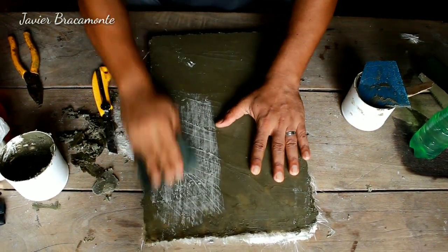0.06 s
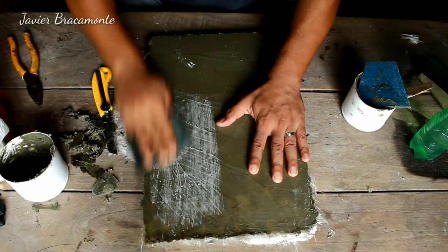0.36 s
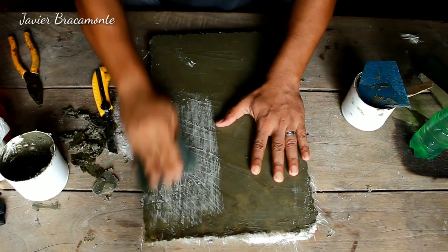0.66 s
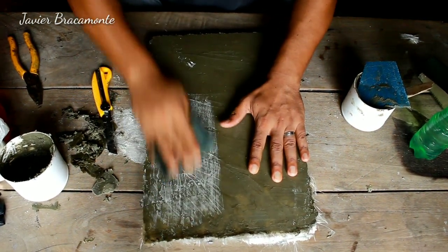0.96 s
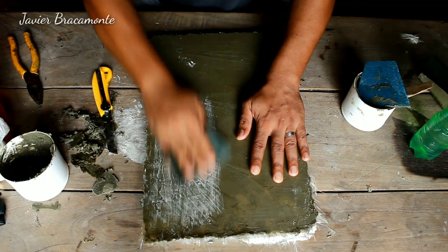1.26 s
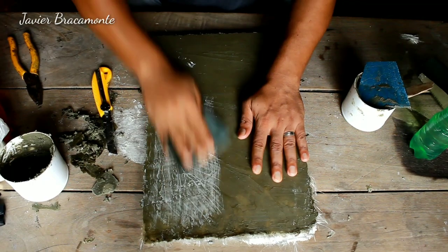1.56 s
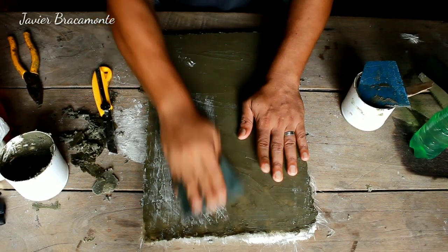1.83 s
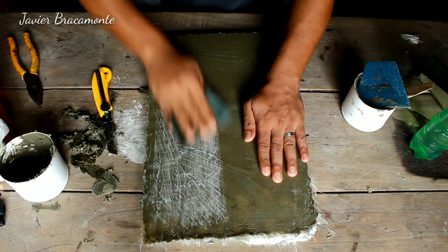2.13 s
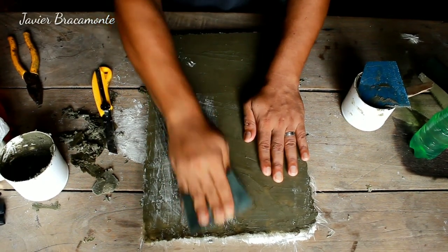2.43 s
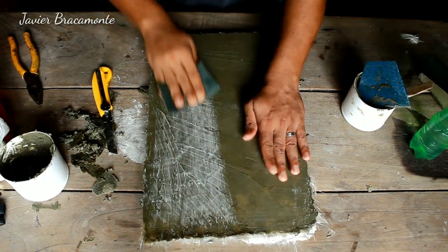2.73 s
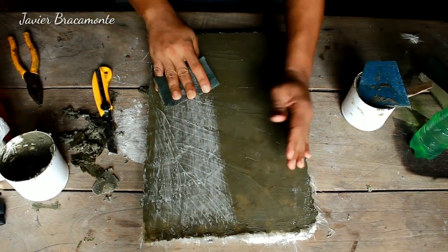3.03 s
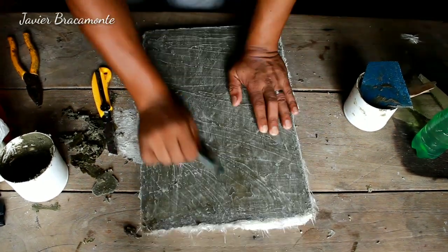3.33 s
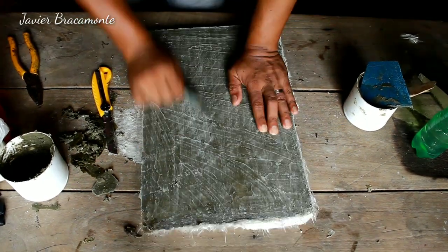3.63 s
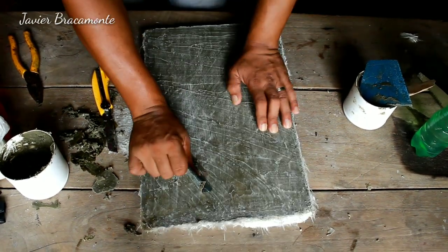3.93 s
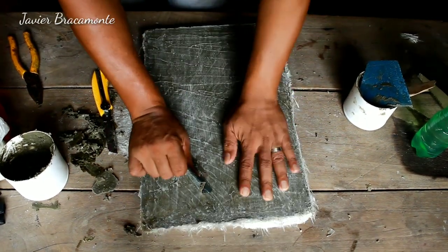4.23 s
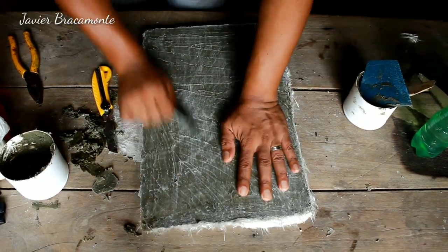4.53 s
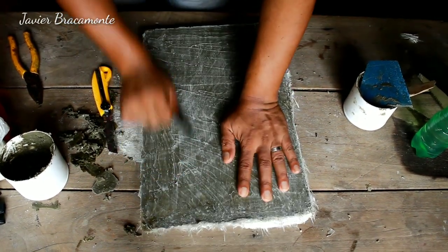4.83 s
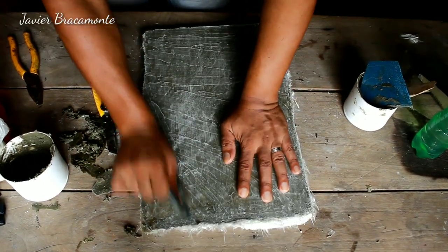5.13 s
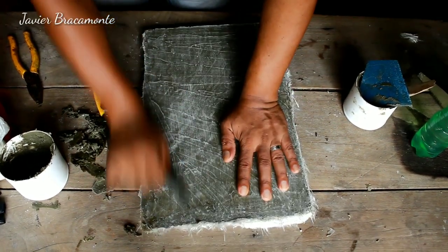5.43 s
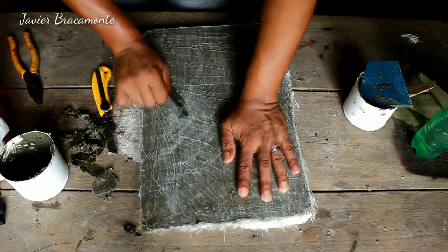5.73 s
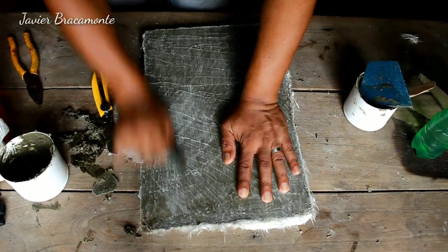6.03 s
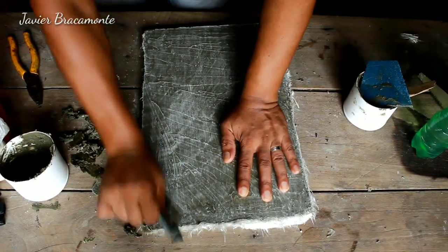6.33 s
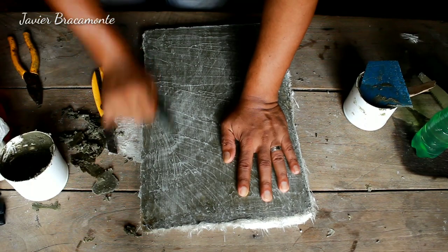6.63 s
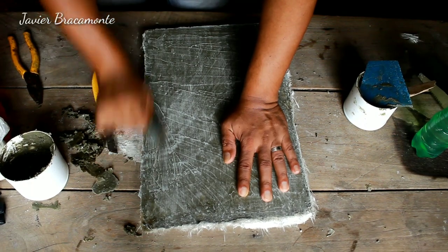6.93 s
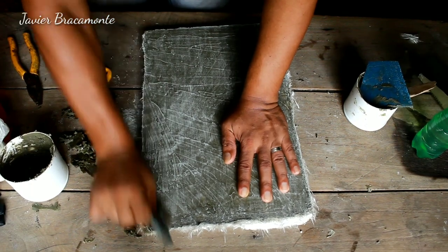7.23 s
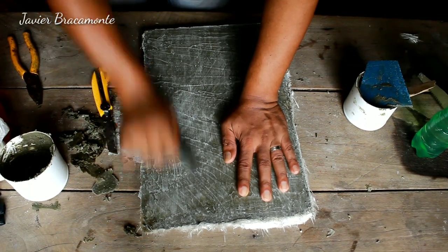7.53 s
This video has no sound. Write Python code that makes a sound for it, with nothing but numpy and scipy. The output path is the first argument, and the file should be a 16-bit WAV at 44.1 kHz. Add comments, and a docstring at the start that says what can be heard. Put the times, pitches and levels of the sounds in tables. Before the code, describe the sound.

Close up in a small, dull-sounding room, sandpaper scrapes evenly to and fro across a slab of hard filler, gritty and slightly squeaky. Midway the work breaks off twice, with tiny snaps of grit. The pad comes down with a crack and the strokes go on faster, the slab rocking against the wooden bench with soft thumps. A low rumble from the boards and a faint hiss lie underneath.

```python
"""Long, rasping strokes of sandpaper, pad flat, on a slab of hard filler; after a pause, quicker ones
with the pad on its edge. One microphone stands close to the wooden workbench, in a dull little room.
Grit catches and lets go, ringing the slab; the pad sticks and slips into brief squeals.
The pad knocks down with a crack, grit snaps, and the slab rocks on the bench at the turns.
Underneath, the boards rumble with the work, over a faint hiss."""
import sys
import numpy as np
from scipy import signal
from scipy.fft import rfft, irfft
from scipy.io import wavfile

SR = 44100
rng = np.random.default_rng(int(sys.argv[2]) if len(sys.argv) > 2 else 0)


def generate_wav(signal):
    """Clip the signal to [-1, 1] and save it as 16-bit WAV at the path in sys.argv[1]."""
    frames = np.transpose(np.atleast_2d(signal))
    scaled = np.clip(frames, -1, 1) * 32767
    pcm = np.round(scaled).astype(np.int16)
    wavfile.write(sys.argv[1], SR, pcm)


N = 338688
TIME = np.arange(N) / SR


def from_db(db):
    """Decibels to amplitude."""
    return 10 ** (np.asarray(db) / 20)


def rms_one(x):
    """Scale to rms 1."""
    return x / np.sqrt(np.mean(x ** 2) + 1e-20)


def cut(x, order, hz, kind="low"):
    """Butterworth low-pass or high-pass."""
    return signal.sosfilt(signal.butter(order, hz, kind, fs=SR, output="sos"), x)


def coloured(x, points):
    """Filter by a spectrum of (f/Hz, level/dB) points."""
    hz, db = np.transpose(points)
    bins = np.maximum(np.arange(len(x) // 2 + 1) * SR / len(x), 1)
    gain = from_db(np.interp(np.log(bins), np.log(hz), db))
    return irfft(rfft(x) * gain, len(x))


def drift(rate_hz):
    """A smooth random wander with rms about 1."""
    step, settle = 40, 2000
    r = np.exp(-2 * np.pi * rate_hz * step / SR)
    noise = rng.standard_normal(N // step + settle + 2)
    slow = signal.lfilter([1], [1, -2 * r, r * r], noise)[settle:]
    return np.interp(np.arange(N) / step, np.arange(len(slow)), rms_one(slow))


def resonance(x, hz, width):
    """Two-pole band-pass, gain 1 at its peak."""
    r, w = np.exp(-np.pi * width / SR), 2 * np.pi * hz / SR
    return signal.lfilter(np.array([1, 0, -1]) * (1 - r * r) / 2, [1, -2 * r * np.cos(w), r * r], x + 1e-18)


def struck(force, modes):
    """A force sets each mode ringing as a decaying sine."""
    out = np.zeros(N)
    for hz, db, t60 in modes:
        r, w = 10 ** (-3 / (t60 * SR)), 2 * np.pi * hz / SR
        out += from_db(db) * signal.lfilter([0, np.sin(w)], [1, -2 * r * np.cos(w), r * r], force + 1e-18)
    return out


# Noise floor at the microphone: f/Hz, level/dB
HISS_SPECTRUM = [(500, -1), (4000, -1), (8000, 1), (12000, -18), (15000, -26)]

def hiss(level_db):
    """A faint, steady hiss, heard in the pauses."""
    return from_db(level_db) * rms_one(coloured(rng.standard_normal(N), HISS_SPECTRUM))


# Reflections of the room around the bench: f/Hz, level/dB
ROOM_SPECTRUM = [(80, 4), (200, -5), (700, 1.5), (1400, -8), (2400, -2), (4000, -5), (6000, 1),
                 (14000, -35)]

def workshop(x, wet_db, t60_s=0.45):
    """The close, direct sound, followed after 4 ms by a short, dull room tail."""
    t = TIME[:SR // 2]
    tail = coloured(rng.standard_normal(len(t)), ROOM_SPECTRUM)
    tail *= from_db(-60 * t / t60_s) * (t > .004)
    tail /= np.sqrt(np.sum(tail ** 2))
    return x + from_db(wet_db) * signal.fftconvolve(x, tail)[:N]


# Low mutter of the bench: f/Hz, level/dB
MUTTER_SPECTRUM = [(15, -42), (30, -22), (42, -3), (55, -11), (80, 0), (105, -5), (138, 5.5), (165, -2.5),
                   (210, -5.5), (260, -9.5), (600, -18), (3000, -24), (14000, -46)]
# Its rise and fall: t/s, level/dB
MUTTER_LEVEL = [(0, -52.5), (2.6, -51), (3.1, -50.5), (4.2, -44.5), (5.0, -49.5), (6.9, -49), (7.6, -44)]
# Bands in which the boards thrum under the rubbing: f/Hz, width/Hz, level/dB
THRUM_BANDS = [(283, 72, 0), (413, 12.4, 0.5), (505, 17, -5), (633, 290, -5)]

def bench_rumble(thrum_db, follow_power, resting):
    """The boards mutter under the arm's shifting weight and thrum a little more with each stroke."""
    level_db = np.interp(TIME, *np.transpose(MUTTER_LEVEL))
    mutter = from_db(level_db) * rms_one(coloured(rng.standard_normal(N), MUTTER_SPECTRUM))
    pressure = stroke_gains(FLAT_STROKES + EDGE_STROKES)[:, 0].sum(axis=0)
    swell = (pressure / pressure.mean() + resting) ** follow_power
    thrum = sum(from_db(db) * resonance(rng.standard_normal(N), hz, width) for hz, width, db in THRUM_BANDS)
    return mutter + from_db(thrum_db) * swell * rms_one(thrum)


# The slab tips against the bench, mostly as a push begins: t/s, level/dB
TIPS = [(.075, -45), (2.191, -33), (2.481, -35), (2.511, -29), (4.122, -40), (4.304, -33.5), (4.777, -32.5),
        (5.16, -32), (5.202, -32), (5.602, -29), (5.98, -32.5), (6.119, -35), (6.454, -33), (6.88, -29.5),
        (7.302, -31)]
# Modes of the bench boards: f/Hz, level/dB, t60/s
BOARD_MODES = [(150, -14, 0.43), (155, -12, 0.42), (185.5, 1, 0.2), (230, -4, .08), (300, -20, 0.089)]

def rocking(bounce_s, bounce_db):
    """The slab tips onto the boards and settles with a weaker bounce."""
    force = np.zeros(N)
    for (s, db), delay_s in zip(TIPS, bounce_s * rng.uniform(0.703, 1.0, len(TIPS))):
        force[round(s * SR)] += from_db(db)
        force[round((s + delay_s) * SR)] += from_db(db + bounce_db)
    return from_db(-2.5) * struck(force, BOARD_MODES)


# Short, sharp snaps of grit, and the crack and bounce of the pad knocking down: t/s, level/dB, f/Hz
SHARP_SNAPS = [(2.559, -5, 7520), (2.559, -7, 2880), (2.868, -16, 7900), (3.08, -26, 3500),
               (3.2334, -16, 5670), (3.241, -23, 5940), (3.429, -23, 3460), (3.999, -28, 8000),
               (4.12, -36, 7100), (4.2958, -19, 4270), (4.303, -35, 7000), (4.323, -28, 7500)]

def snaps(decay_s, width_hz):
    """Each snap of grit or crack of the pad is a tiny burst of pitched noise."""
    out, t = np.zeros(N), TIME[:1000]
    for s, db, hz in SHARP_SNAPS:
        burst = resonance(rng.standard_normal(len(t)) * np.exp(-t / decay_s), hz, width_hz)
        at = round(s * SR)
        out[at:at + len(t)] += from_db(db) * burst / np.abs(burst).max()
    return cut(out, 4, 9500)


# The pad or a hand comes down on the slab: t/s, level/dB, hardness/Hz
CONTACTS = [(2.198, -15, 597), (2.56, -11.5, 5020), (3.08, -38, 5000), (4.12, -30, 3000),
            (4.283, -32, 2500), (4.2958, -4.5, 3000), (4.322, -25, 900)]
# Modes of the slab lying on the bench: f/Hz, level/dB, t60/s
KNOCK_MODES = [(88, -34, .12), (144.6, -23, 0.14), (294, -26.5, 0.087), (460, -28, 0.11), (696, -28, 0.11),
               (1010, -24, 0.041), (1270, -14.5, 0.037), (1480, -7, 0.011), (1746, -12.5, 0.036),
               (2230, -16, .01), (2500, -16.5, 0.015), (2820, -16, 0.012), (3240, -13, 0.017),
               (3750, -17, 0.016), (4880, -15, 0.011)]

def knocks(pad_cut_hz, rebound_hz):
    """Each contact is a brief, cushioned push on the slab; a soft one lasts longer and sounds duller."""
    force = np.zeros(N)
    for s, db, hard_hz in CONTACTS:
        push = np.exp(-2 * np.pi * hard_hz * TIME[:400])
        at = round(s * SR)
        force[at:at + len(push)] += from_db(db) * push / push.sum()
    force = cut(force, 4, pad_cut_hz)
    force = cut(force, 1, rebound_hz, "high")   # the pad springs back
    return -from_db(7.0) * struck(force, KNOCK_MODES)


# Gritty squeals and groans of the pad: centre t/s, f/Hz, width/Hz, level/dB, length/s
STICK_SLIPS = [(.171, 6140, 200, -26, .06), (0.205, 1880, 305, -30, 0.37), (0.443, 4950, 460, -17.5, 0.074),
               (0.447, 1900, 250, -27, 0.075), (0.82, 4995, 151, -25, .06), (1.031, 1460, 80, -30, 0.076),
               (2.12, 1400, 119, -35, 0.045), (2.226, 740, 120, -28.5, 0.1), (2.272, 1420, 110, -27, .04),
               (2.277, 4030, 250, -20, 0.075), (2.71, 4100, 149, -25, 0.085), (2.773, 1340, 202, -22, .05),
               (3.198, 650, 800, -35.5, 0.06), (3.72, 5060, 151, -19, 0.043),
               (3.738, 3800, 150, -18, 0.029), (3.801, 1636, 70, -28, 0.081),
               (4.705, 2650, 100, -27, 0.056), (5.052, 2650, 120, -22.5, 0.045),
               (5.906, 3190, 105, -25, 0.05), (6.116, 2730, 200, -30, 0.062),
               (6.338, 4720, 90.6, -23, 0.039), (6.724, 2240, 110, -28.5, 0.045),
               (7.207, 1786, 246, -22.5, 0.091), (7.35, 2630, 110, -22, 0.053)]

def squeals():
    """The pad sticks and slips, and one of its resonances swells and fades."""
    out, t = np.zeros(N), TIME[:SR // 4] - 1 / 8
    for s, hz, width, db, length in STICK_SLIPS:
        swell = np.cos(np.pi * np.clip(t / length, -.5, .5))
        voice = resonance(rng.standard_normal(len(t)), hz, width)
        voice = rms_one(cut(voice, 2, min(2 * hz, SR / 3)))   # the pad muffles its top
        at = max(round(s * SR) - len(t) // 2, 0)
        out[at:at + len(t)] += (from_db(db) * swell * voice)[:N - at]
    return out


# How body, rasp and hiss answer the hand, a row each: power of speed, share of the stroke's loss
HAND_RESPONSE = [(1.28, 0.57), (1.73, 1.0), (2.14, 1.33)]

def stroke_gains(strokes, brake_share=0.63, lean_db=5.0):
    """The hand speeds up, slows and brakes. Gains are indexed [push or pull, register, sample]."""
    power = np.zeros((2, 3, N))
    for start, length, run_up, rasp_db, body_db, hiss_db, loss_db, direction in strokes:
        during = (TIME > start) & (TIME < start + length)
        t = TIME[during] - start
        along, pulling = t / length, int(direction < 0)
        speed = np.sin(np.pi / 2 * np.clip(t / run_up, 0, 1))
        speed *= np.sin(np.pi / 2 * np.clip((1 - along) / brake_share, 0, 1))
        leaning_db = lean_db * (along - .5) * pulling   # the hand bears down late in a pull
        offsets_db = (body_db + leaning_db, 0, hiss_db)
        for register, (exponent, share) in enumerate(HAND_RESPONSE):
            level_db = rasp_db + offsets_db[register] - share * loss_db * (along - .5)
            power[pulling, register, during] += (speed ** exponent * from_db(level_db)) ** 2
    return np.sqrt(power)


def grit(strength, grains_per_s=9000, spread_db=1.0, fine_db=1.0):
    """Grains catch and let go, more often in a strong stroke, over the steady rub of fine dust."""
    chance = np.clip(grains_per_s * np.sqrt(strength / strength.max()) / SR, 1e-4, 1)
    sizes = from_db(spread_db * np.minimum(rng.exponential(1, N), 5)) * rng.choice([-1, 1], N)
    catches = sizes * (rng.random(N) < chance) / np.sqrt(chance)
    return rms_one(catches) + from_db(fine_db) * rng.standard_normal(N)


def pad_flex(force, low_hz=1004, high_hz=6950, depth=0.15, rate_hz=7, width_share=0.16):
    """The pad flexes as it travels, favouring now one band, now another."""
    bands = np.geomspace(low_hz, high_hz, 10)
    return force + depth * sum(drift(rate_hz) * resonance(force, hz, width_share * hz) for hz in bands)


def pad_curl(x, start_s, takes_s, depth, hz, width_hz):
    """The pad curls; sound from under it meets the direct sound out of phase and thins one band."""
    curl = np.clip((TIME - start_s) / takes_s, 0, 1)
    return x - depth * curl * resonance(x, hz, width_hz)


# Narrow resonances of the slab under the pad: f/Hz, width/Hz, level/dB re the direct scraping
SLAB_RESONANCES = [(815, 120, -14), (866, 9.7, 0.5), (1216, 15, -9.5), (1405, 8, -1), (1750, 27, -10),
                   (1940, 45, -8), (2030, 39, -40), (2830, 48, -31), (3270, 70, -29), (3820, 60, -16),
                   (4330, 120, -13), (4620, 49, -7)]

def slab_ring(force, wander_db=3.0):
    """The slab's resonances come and go as the pad travels over it."""
    return force + sum(from_db(db + wander_db * drift(8)) * resonance(force, hz, width)
                       for hz, width, db in SLAB_RESONANCES)


def registers(x, body_below_hz=2300, hiss_above_hz=5500):
    """Split into low body, middle rasp and high hiss, each with rms 1."""
    bins = np.maximum(np.arange(N // 2 + 1) * SR / N, 1)
    low = 1 / (1 + (bins / body_below_hz) ** 12)
    high = 1 / (1 + (hiss_above_hz / bins) ** 12)
    spectrum = rfft(x)
    return [rms_one(irfft(spectrum * band, N)) for band in (low, 1 - low - high, high)]


def scrape(strokes, push_spectrum, pull_spectrum, judder_db, body_rasp_hiss_db):
    """Grit drives pad and slab; the pad sits and sounds differently when pushed and when pulled."""
    gains = stroke_gains(strokes)
    strength = gains[:, 1].sum(axis=0) + 1e-3
    force = slab_ring(pad_flex(grit(strength)))
    grip_db = judder_db * drift(33)   # the pad grips unevenly
    flutters = [from_db(db + grip_db + 0.66 * drift(4)) for db in body_rasp_hiss_db]
    out = np.zeros(N)
    for envelopes, spectrum in zip(gains, (push_spectrum, pull_spectrum)):
        bands = registers(coloured(force, spectrum))
        out += sum(envelope * flutter * band for envelope, flutter, band in zip(envelopes, flutters, bands))
    return out


# The scraping at close range, for each grip and direction: f/Hz, level/dB
FLAT_PUSH_SPECTRUM = [(260, -38), (450, -12), (577, -14), (730, -4.5), (809, -8), (884, -3.5), (1050, -2),
                      (1260, 1), (1610, 1), (1790, -0.5), (2820, 5), (5950, 3), (8220, 2.5), (11900, -20),
                      (15000, -37)]
FLAT_PULL_SPECTRUM = [(260, -63), (450, -16.5), (631, -8), (730, -3.5), (937, -6), (1020, 0.5), (1290, 0),
                      (1370, 2), (1980, 0), (3030, 11), (5140, 9.5), (6410, 5), (7640, 8.5), (10100, -5.5),
                      (15000, -32)]
EDGE_PUSH_SPECTRUM = [(260, -46), (450, -12), (561, -14.5), (612, -15.5), (763, -6.5), (833, -15),
                      (884, -7), (1260, -3), (1640, 0), (2230, -1), (2580, 3), (4370, -2), (7530, 1.5),
                      (10500, -12), (15000, -35.5)]
EDGE_PULL_SPECTRUM = [(260, -40), (450, -17), (521, -13.5), (730, -2.5), (821, -10), (884, -4.5),
                      (1190, -0.5), (1840, 4), (3410, -0.5), (3780, 1), (4370, -3), (4780, -1), (7750, 2),
                      (10500, -11.5), (15000, -35)]
# Strokes and small shifts with the pad flat: t/s, length/s, run-up/s, rasp level/dB,
# body/dB re rasp (grows with pressure), hiss/dB re rasp (grows with speed),
# loss/dB along the stroke as the hand slows, direction (+ push, - pull)
FLAT_STROKES = [(-.222, .33, .1, -21.5, -7.5, -1, 7.5, -1), (.053, 0.34, .11, -18, -13.5, -2.5, -4.5, 1),
                (.353, .35, 0.092, -21.5, -6.5, 0, 9, -1), (.65, 0.33, 0.11, -19.5, -10, 0, -3.5, 1),
                (.94, 0.34, 0.099, -19, -9, -1, 2, -1), (1.233, .35, .11, -18.5, -8.5, -0.5, -3.5, 1),
                (1.54, .37, .08, -20, -7.5, -1.5, 6, -1), (1.859, .36, 0.11, -18.5, -6.5, -0.5, -6, 1),
                (2.165, 0.36, .09, -21, -5.5, 0, 9.5, -1), (2.461, .47, .11, -19.5, -7, -2, -17.5, 1),
                (2.87, 0.38, 0.027, -47, 0, -7, 20.5, 1), (3.17, 0.23, 0.015, -42.5, -2.5, -6, 0, -1),
                (3.343, 0.089, 0.023, -26, -2, 2.5, 2, 1)]
# Strokes with the pad on its edge, running together as the hand swings round: same columns
EDGE_STROKES = [(3.448, .245, 0.2, -22, -3, 5.5, -3.5, 1), (3.654, 0.3, 0.073, -22, -5, -0.5, 17.5, -1),
                (3.8, 0.31, 0.032, -35, 1, -5, 7, -1), (4.0, 0.27, 0.047, -51.5, -2, -9, 6, -1),
                (4.299, 0.28, 0.2, -22.5, -2.5, 4.5, -6, 1), (4.537, 0.29, .11, -20, -4.5, -1.5, 13, -1),
                (4.759, 0.26, 0.094, -22, -5, 0.5, -4.5, 1), (4.97, .24, 0.11, -18, -7.5, -1, 12.5, -1),
                (5.152, .27, .11, -21, -6, 1, -9.5, 1), (5.377, .25, 0.088, -18, -6.5, .5, 4, -1),
                (5.564, .28, 0.12, -22.5, -5.5, 3, -8.5, 1), (5.797, 0.26, .11, -20, -7.5, 1.5, 7, -1),
                (5.99, .27, 0.12, -22.5, -6.5, 3.5, -11.5, 1), (6.22, .28, 0.1, -19.5, -7, -0.5, 12, -1),
                (6.43, .27, 0.099, -22, -8, 1.5, -8, 1), (6.652, 0.27, 0.083, -22.5, -5.5, 0.5, 11.5, -1),
                (6.847, 0.27, .11, -23, -5, 3, -14, 1), (7.076, 0.29, 0.066, -23, -5.5, 1.5, 11, -1),
                (7.287, .25, 0.098, -19, -8.5, 2, -6, 1), (7.486, 0.3, 0.13, -18.5, -8.5, -1.5, 10.5, -1)]

def sanding():
    """The hand works the slab with the pad flat, then on its edge; late in the work the pad curls."""
    flat = scrape(FLAT_STROKES, FLAT_PUSH_SPECTRUM, FLAT_PULL_SPECTRUM,
                  judder_db=0.36, body_rasp_hiss_db=(0.5, -1.5, -1.3))
    edge = scrape(EDGE_STROKES, EDGE_PUSH_SPECTRUM, EDGE_PULL_SPECTRUM,
                  judder_db=0.8, body_rasp_hiss_db=(-0.5, -0.8, 0.1))
    return pad_curl(flat + edge, start_s=6.1, takes_s=0.56, depth=0.24, hz=4000, width_hz=2600)


def scene():
    """One microphone close to the slab on the workbench, carried on both channels."""
    scraping = workshop(sanding() + squeals(), wet_db=-22)
    contacts = workshop(knocks(pad_cut_hz=4800, rebound_hz=280), wet_db=-9.5)
    contacts += snaps(decay_s=.0015, width_hz=950)
    contacts += rocking(bounce_s=0.02475, bounce_db=-5)
    contacts = cut(contacts, 2, 85, "high")   # the contacts carry no deep bass
    background = bench_rumble(thrum_db=-45.5, follow_power=0.37, resting=.1) + hiss(level_db=-60)
    mono = background + contacts + scraping
    return np.array([mono, mono])


def record(dry):
    """The highest peaks are rounded just under full scale and the top is cut steeply at 15.4 kHz."""
    rounded = dry / (1 + (dry / .95) ** 8) ** (1 / 8)
    return signal.sosfilt(signal.ellip(12, .05, 90, 15400, fs=SR, output="sos"), rounded)


dry = scene()
out = record(dry)
generate_wav(out)
```